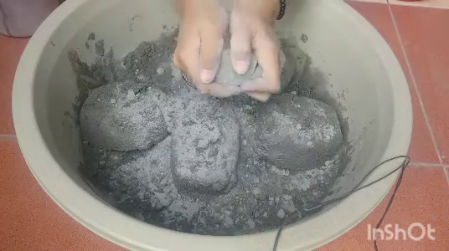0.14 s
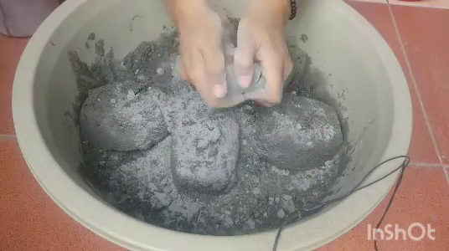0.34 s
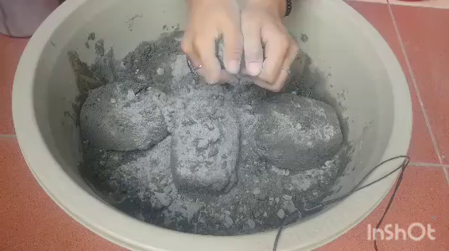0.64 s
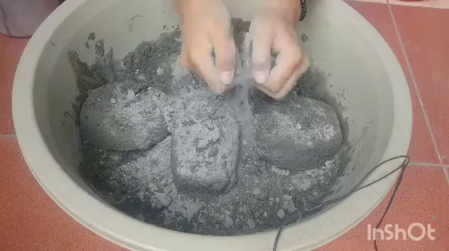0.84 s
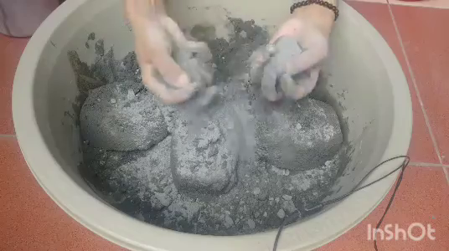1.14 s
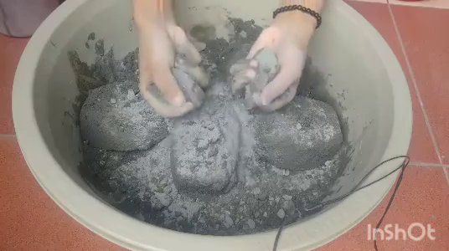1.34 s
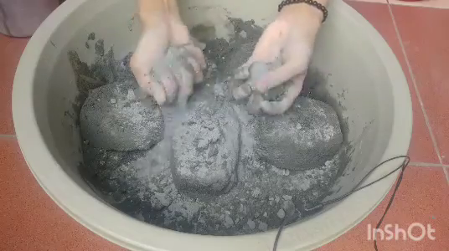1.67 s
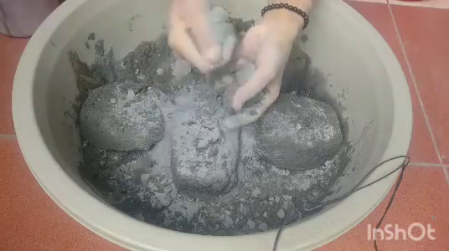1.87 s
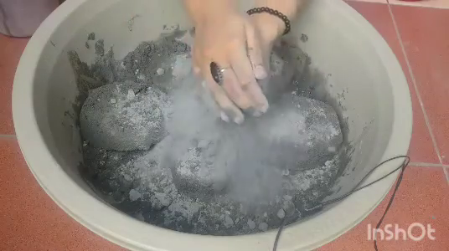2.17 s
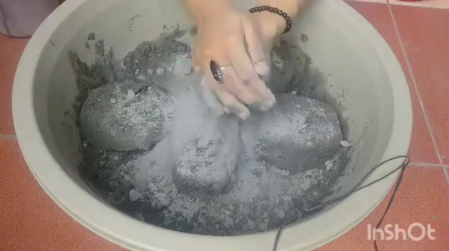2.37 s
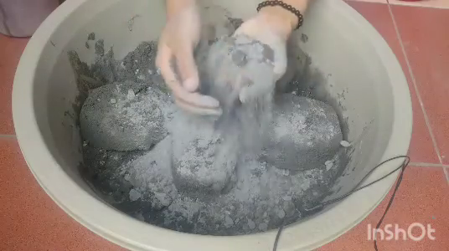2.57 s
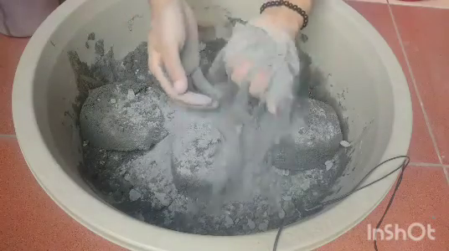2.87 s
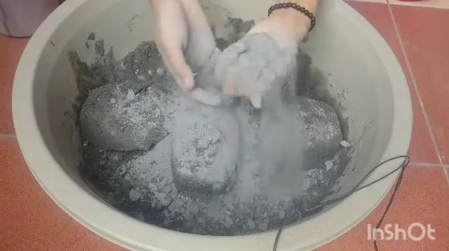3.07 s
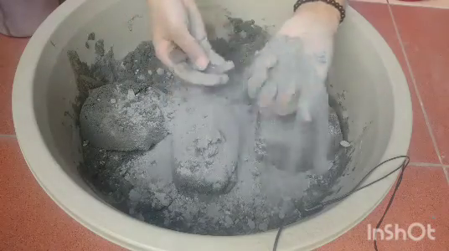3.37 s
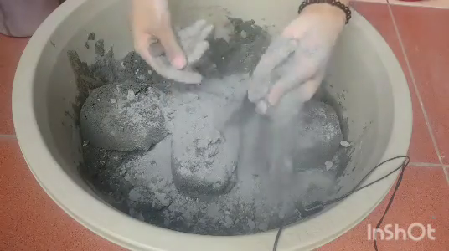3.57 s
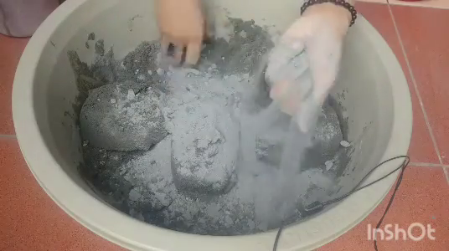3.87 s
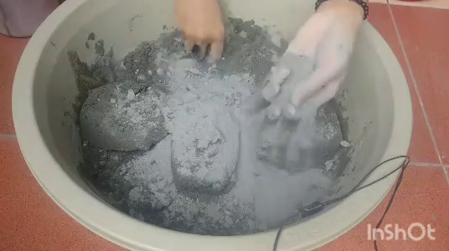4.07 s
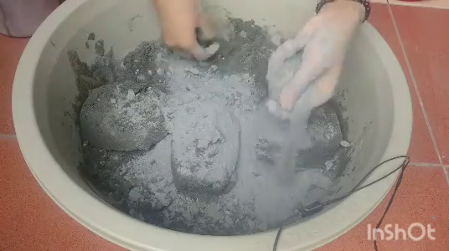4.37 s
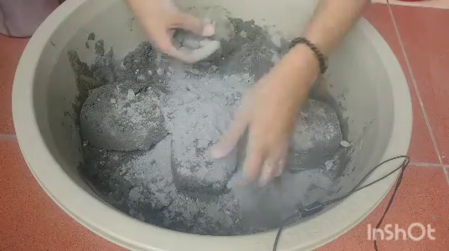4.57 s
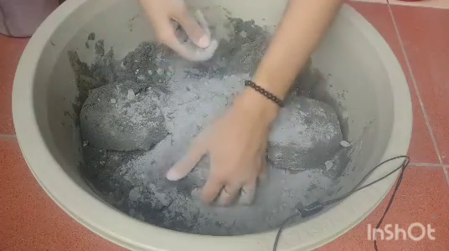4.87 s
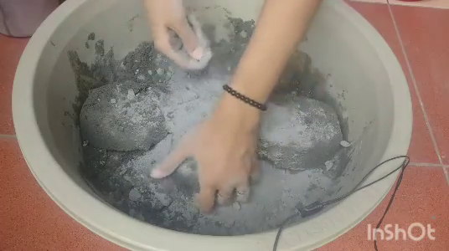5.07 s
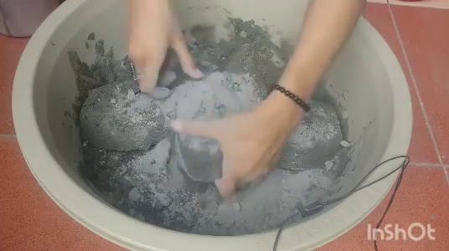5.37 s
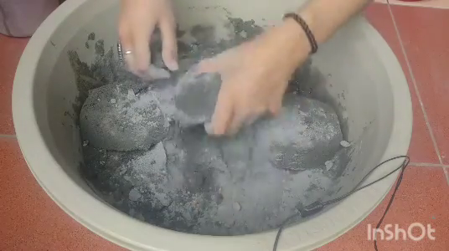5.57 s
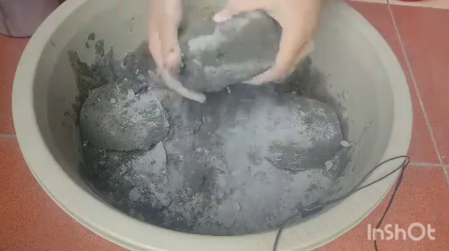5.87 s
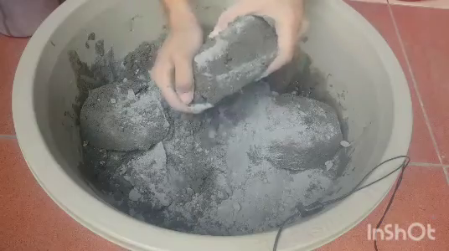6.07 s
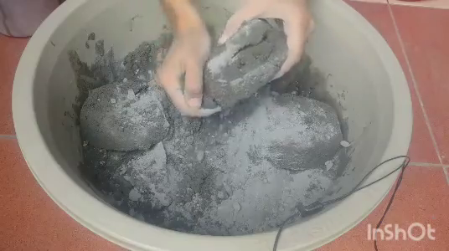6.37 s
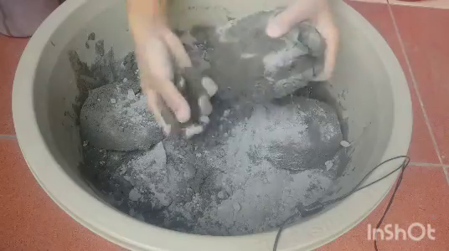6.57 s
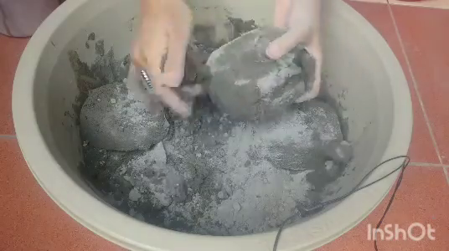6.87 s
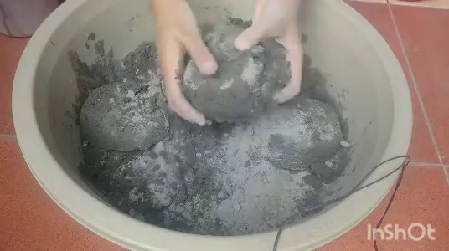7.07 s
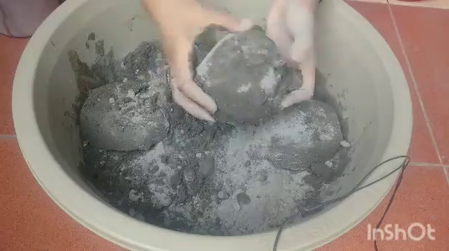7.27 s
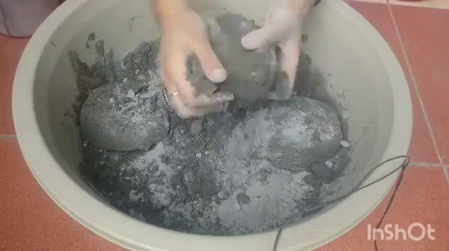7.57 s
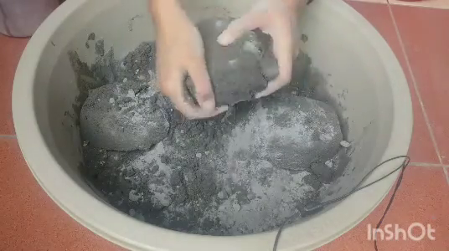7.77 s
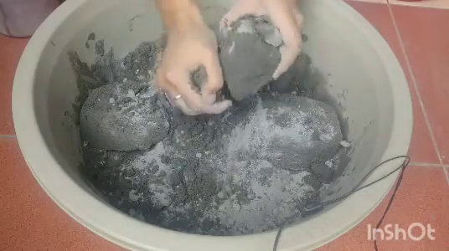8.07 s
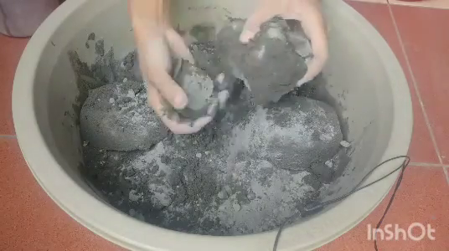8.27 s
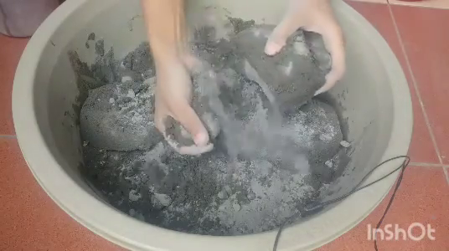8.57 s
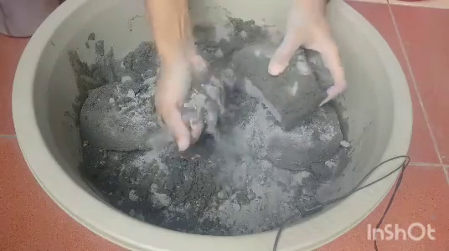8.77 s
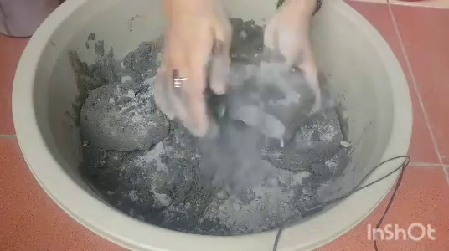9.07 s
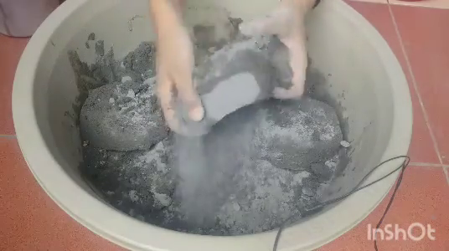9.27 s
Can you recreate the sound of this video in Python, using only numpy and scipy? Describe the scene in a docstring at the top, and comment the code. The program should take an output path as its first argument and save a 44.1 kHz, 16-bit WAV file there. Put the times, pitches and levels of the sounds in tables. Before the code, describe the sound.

Dry lumps crunch and crack between fingers close by, spilling hissing grit and pattering crumbs into a plastic tub.

```python
"""Over a wide plastic tub, close to a phone, hands squeeze dry powder blocks.
Grit rasps and pours in gusts as the fingers rub through it, and crumbs crunch and patter down.
Lumps snap with a sharp tick and a rough knock, and drop onto the tub floor with dull thuds.
A low rumble fills the room behind them."""
import sys
import numpy as np
from scipy import signal
from scipy.fft import rfft, irfft
from scipy.io import wavfile
from scipy.ndimage import uniform_filter1d

SR = 44100
rng = np.random.default_rng(int(sys.argv[2]) if len(sys.argv) > 2 else 0)


def wav_record(signal):
    """Record a signal, one row per channel, as 16-bit PCM in the file named by sys.argv[1]."""
    frames = np.transpose(np.atleast_2d(signal))
    bounded = np.clip(frames, -1, 1)
    # unit amplitude maps onto the largest positive 16-bit level
    quanta = np.round(bounded * 32767).astype(np.int16)
    wavfile.write(sys.argv[1], SR, quanta)


N = 416304


def rubbing_powder():
    """Powder of several grain sizes rubs and spills in gusts, flickering as the fingers slip."""
    # finger strokes through the powder: peak_s, rise_s, fall_s, rasp_db, fringe_db, dust_db
    strokes = [(0.04, 0.12, 0.067, -59.5, -66, -73), (0.15, 0.061, .09, -57, -62, -72),
               (0.253, 0.044, 0.046, -60, -66, -74), (0.46, .12, 0.093, -55, -56, -65),
               (0.57, 0.092, .1, -60.5, -63, -66), (0.825, .06, 0.062, -48.5, -51, -63),
               (0.968, 0.063, 0.14, -64, -66, -69), (1.157, 0.091, 0.077, -55, -63, -72),
               (1.24, 0.059, 0.097, -42, -56, -65), (1.305, 0.018, 0.08, -37, -45.5, -62),
               (1.401, 0.017, .04, -40.5, -58, -65), (1.464, 0.027, 0.067, -36, -42, -58),
               (1.56, .07, .06, -45.5, -50, -70), (1.63, 0.08, 0.15, -41, -47.5, -60),
               (1.82, 0.22, 0.081, -49, -56, -70), (1.945, 0.086, .06, -49, -54.5, -62),
               (2.001, .08, 0.059, -42.5, -51.5, -64), (2.138, 0.022, 0.11, -40.5, -52, -63),
               (2.26, 0.42, .1, -48.5, -58.5, -74), (2.305, 0.042, 0.081, -43, -54, -68),
               (2.407, 0.059, 0.062, -36, -54, -72), (2.582, 0.33, 0.064, -46.5, -59, -78),
               (2.828, 0.18, .14, -42.5, -54, -68), (2.935, 0.099, 0.13, -37.5, -49.5, -69),
               (3.173, 0.034, 0.14, -49.5, -58, -76), (3.358, 0.016, 0.035, -35.5, -50, -58),
               (3.492, .015, 0.11, -54, -55.5, -80), (3.622, 0.028, 0.08, -42.5, -57, -68),
               (3.668, 0.036, .1, -38, -44.5, -62), (3.77, .1, .12, -48, -53, -67),
               (3.885, 0.12, 0.076, -40.5, -50.5, -59), (3.975, 0.0088, 0.025, -36, -70, -65),
               (4.019, 0.031, 0.049, -33, -61, -76), (4.145, 0.051, 0.038, -41.5, -63, -79),
               (4.292, 0.058, 0.082, -43.5, -58, -78), (4.352, .05, .065, -42.5, -56, -73),
               (4.446, 0.052, 0.077, -49, -70, -73), (4.683, 0.037, 0.058, -55, -68, -78),
               (4.771, 0.08, 0.081, -54.5, -58.5, -79.5), (4.883, .012, 0.041, -41.5, -54, -69),
               (4.925, 0.037, 0.046, -49, -72, -83), (5.038, 0.0052, .03, -42, -59, -76),
               (5.065, .03, .05, -48, -62, -74), (5.13, 0.074, 0.091, -48, -59, -73),
               (5.204, 0.19, 0.12, -43.5, -56.5, -68), (5.49, 0.12, 0.17, -59, -69, -81),
               (5.69, 0.16, 0.058, -59.5, -67, -65), (6.036, 0.22, .07, -59, -62.5, -67),
               (6.106, 0.036, 0.085, -48.5, -51, -60), (6.25, .05, .08, -63, -66, -76),
               (6.345, 0.065, 0.053, -56, -60.5, -71), (6.491, 0.1, 0.18, -63.5, -76, -75),
               (6.72, 0.12, 0.19, -50.5, -56.5, -65), (6.82, 0.13, .1, -53, -59, -74),
               (6.914, 0.038, 0.045, -49, -44.5, -53), (6.976, 0.13, 0.047, -46, -52, -80),
               (7.068, .043, 0.098, -45, -48, -56), (7.234, .09, .2, -55, -71, -76),
               (7.35, .08, 0.11, -51.5, -50.5, -65), (7.46, 0.08, 0.07, -62, -56, -67),
               (7.59, 0.062, 0.14, -61, -58, -74), (7.69, 0.081, 0.044, -57, -60, -70),
               (7.836, 0.15, 0.16, -57, -57.5, -68), (7.922, 0.027, 0.025, -46.5, -48.5, -66),
               (8.054, 0.057, 0.094, -47, -53.5, -64), (8.45, 0.25, 0.11, -62, -62, -75),
               (8.542, 0.034, 0.054, -33, -35.5, -51), (8.695, 0.082, 0.074, -35, -34, -49),
               (8.771, .1, .2, -36, -43.5, -59.5), (8.903, 0.11, 0.33, -50, -60, -69),
               (9.2, .03, .15, -45.5, -52.5, -75), (9.245, 0.068, 0.11, -46, -47.5, -61),
               (9.439, 0.26, .1, -52, -51.5, -66)]
    # crumbs breaking up and falling into the tub: peak_s, rise_s, fall_s, crunch_db, patter_db
    spills = [(0.152, .1, 0.04, -68, -48), (0.76, 0.24, 0.37, -65.5, -47.5), (1.321, .25, 0.12, -58, -49),
              (1.401, 0.023, 0.03, -41.5, -39.5), (1.475, 0.074, 0.067, -47.5, -47),
              (1.622, 0.092, 0.22, -49.5, -46.5), (1.92, 0.13, 0.26, -64, -69),
              (2.137, 0.047, 0.076, -46, -42.5), (2.297, 0.021, 0.057, -44, -36.5),
              (2.385, 0.012, 0.042, -31.5, -32), (2.55, 0.46, 0.14, -52.5, -60),
              (2.73, 0.099, 0.097, -58.5, -53), (2.826, 0.026, 0.062, -48.5, -63),
              (2.96, 0.23, 0.11, -51.5, -54), (3.173, 0.018, 0.058, -46, -42),
              (3.356, 0.022, 0.068, -51.5, -45.5), (3.496, 0.018, 0.053, -54, -39),
              (3.526, 0.044, 0.03, -45, -52), (3.6, 0.027, 0.7, -57, -49.5), (3.879, 0.05, .11, -51.5, -57),
              (3.977, 0.0064, 0.081, -36, -28.5), (4.01, 0.033, 0.075, -37.5, -25.5),
              (4.143, 0.035, .04, -35.5, -34), (4.284, 0.038, 0.079, -43, -41.5),
              (4.356, 0.026, 0.041, -35.5, -36), (4.426, 0.0075, 0.051, -40, -44),
              (4.681, .08, 0.042, -54.5, -37.5), (4.883, 0.067, 0.038, -65, -46),
              (5.043, 0.053, 0.11, -70, -53), (5.148, 0.063, 0.17, -60, -53), (5.218, 0.17, 0.12, -56, -62),
              (5.55, 0.29, 0.39, -65.5, -51), (6.186, 0.089, 0.17, -70, -54),
              (6.719, 0.094, 0.11, -59, -56), (6.902, 0.015, 0.057, -33.5, -20),
              (6.982, .1, 0.055, -39.5, -38.5), (7.056, 0.038, 0.16, -50, -43.5),
              (7.236, 0.048, 0.11, -52, -40.5), (7.76, 0.36, 0.22, -68, -48), (7.922, .1, .2, -69, -63),
              (8.054, .12, 0.074, -61, -47), (8.531, 0.018, 0.043, -42, -39),
              (8.68, 0.018, 0.05, -24.5, -34.5), (8.75, 0.056, 0.12, -43, -40),
              (8.892, 0.16, 0.14, -52, -53), (9.012, .05, 0.11, -55, -38),
              (9.205, 0.016, 0.086, -39, -28.5), (9.265, .05, .046, -35.5, -40),
              (9.333, 0.059, 0.093, -47, -41.5)]
    # tone of each grain layer: frequency_hz, gain_db
    rasp_eq = [(2000, -38), (3000, -12), (3500, -9.5), (3800, -4), (4300, 0), (4900, -7), (5400, -17),
               (7000, -49), (9000, -56)]  # gritty scrape
    fringe_eq = [(1500, -25), (2600, -11), (3300, -10.5), (5000, -4), (6000, -4.5), (7200, -8), (7900, -29),
                 (9000, -39), (12000, -80)]  # its bright edge
    dust_eq = [(5000, -47), (7500, -14), (9500, -13), (12000, -8.5), (14000, -10), (16500, -11.5)]  # airy sizzle of the finest powder
    crunch_eq = [(200, -70), (450, -6), (700, 5), (1000, 3), (1600, 3.5), (2500, -0.5), (3500, -7),
                 (5000, -32), (8000, -102)]  # midrange of breaking crumbs
    patter_eq = [(60, -58), (130, -17), (200, 9.5), (350, 7), (600, 2), (900, -30.5), (2000, -68)]  # dull landings
    rasp, fringe, dust = swells(strokes, rest_db=(-74.5, -77, -78))
    crunch, patter = swells(spills, rest_db=(-68.5, -55.5))
    slip = undb(1.5 * flicker(70))
    return (grains(rasp_eq, per_s=3000, spread_db=7.2, hiss=0.93) * rasp * slip
            + grains(fringe_eq, per_s=3500, spread_db=3.8, hiss=0.45) * fringe * slip
            + grains(dust_eq, per_s=4000, spread_db=2.5, hiss=1.2) * dust * undb(1.4 * flicker(57))
            + grains(crunch_eq, per_s=900, spread_db=5.1, hiss=0.96) * crunch * undb(0.76 * flicker(80))
            + grains(patter_eq, per_s=400, spread_db=3.5, hiss=0.8) * patter)


def snapping_lumps():
    """Each lump breaks with a sharp tick, a short rough knock and a spray of debris."""
    # snaps, with peak levels ahead of dull_eq: start_s, tick_db, tick_hz, body_db, body_hz
    snaps = [(0.14, -36.5, 4330, -53, 540), (1.296, -38, 4150, -38.5, 540), (1.3958, -11, 4020, -17, 1460),
             (1.456, -20.5, 4660, -44, 1450), (1.6572, -25, 4530, -40, 1210),
             (1.9098, -33, 3930, -48, 1330), (1.9356, -31.5, 4270, -59, 650),
             (2.1274, -24.5, 4300, -39.5, 1230), (2.2944, -31, 3080, -11, 1000),
             (2.305, -20, 4120, -28, 1460), (2.3764, -14, 3140, -15, 796), (2.388, -20, 3660, -17.5, 940),
             (2.3998, -24, 4060, -19, 1580), (2.45, -46, 3500, -33.5, 865), (2.471, -29, 4300, -40, 1520),
             (2.5087, -32, 4300, -47, 1650), (2.8177, -8.5, 3770, -28.5, 1420),
             (2.979, -31, 3970, -37.5, 520), (3.167, -5, 2970, -14.5, 970), (3.351, -15.5, 4350, -24, 1000),
             (3.4226, -37.5, 4240, -47, 910), (3.4865, -33.5, 3840, -22.5, 643),
             (3.5166, -30, 3090, -28, 790), (3.594, -31, 3080, -37, 690), (3.6992, -37, 4300, -45, 726),
             (3.9695, -18.5, 3860, -30, 650), (3.9787, -22, 3700, -30, 620), (4.0313, -24, 4200, -21, 580),
             (4.34, -26, 4230, -32, 1480), (4.4259, -27, 3570, -29.5, 980), (4.6765, -32, 3730, -30, 510),
             (4.8746, -29, 4300, -46, 620), (5.036, -33, 4170, -63, 900), (6.7134, -40, 4280, -37, 754),
             (6.8714, -35, 4120, -33, 670), (6.8928, -24, 2630, -15.5, 746),
             (6.9063, -14, 2600, -15.5, 864), (6.9158, -22, 4090, -18, 774), (6.95, -33, 4130, -23.5, 710),
             (7.0517, -16.5, 4150, -24.5, 1860), (7.064, -22.5, 3830, -39, 1130),
             (7.097, -29.5, 3800, -42, 800), (7.2313, -20, 4300, -17, 810), (8.5253, -17, 4460, -29, 1500),
             (8.63, -26.5, 4000, -48, 1300), (8.664, -18, 4070, -25, 1360), (8.6737, -11, 3530, -13, 1310),
             (8.6763, -3.5, 4130, -3.5, 1320), (8.696, -27, 3830, -8, 1170), (8.7005, -21, 4040, -0.5, 810),
             (8.7065, -9.5, 4000, -23, 1290), (8.712, -15, 3800, -18, 1140), (8.7547, -23, 3800, -38, 1160),
             (8.766, -29, 4150, -21, 1090), (8.8825, -15.5, 3930, -29.5, 1030),
             (9.0072, -25, 4000, -22.5, 630), (9.176, -33.5, 4200, -43.5, 740), (9.1966, -9, 3660, -9, 990),
             (9.2007, -41, 3570, -11, 640), (9.215, -26, 3600, -30, 816), (9.2221, -24, 4100, -31, 1230),
             (9.2463, -23, 4050, -31, 1110), (9.255, -2.5, 2800, -5, 1140), (9.2658, -25, 3260, -24, 830),
             (9.2746, -30, 3620, -32, 650), (9.3256, -17, 5900, -18, 1190)]
    # broad tone of tick and debris: frequency_hz, gain_db
    tick_eq = [(300, -4), (800, -15), (1500, -14), (2500, -4), (4200, 6.5), (5500, -3.5), (7500, -8.5),
               (9000, -62.5), (16000, -39)]
    # dulls the snaps' treble above 5 kHz, as the microphone colours them: frequency_hz, gain_db
    dull_eq = [(5000, 0.5), (7200, -12), (8200, -23), (11000, -17), (16000, -50)]
    body_cycles, debris_db = 7, -18  # decay time in periods of body_hz; debris rms under the tick
    out, t = np.zeros(N), np.arange(4096) / SR
    noise = rng.standard_normal((len(snaps), 3, len(t)))
    broad = response(tick_eq, len(t))
    for snap, (tick_noise, debris_noise, body_noise) in zip(snaps, noise):
        start_s, tick_db, tick_hz, body_db, body_hz = snap
        burst = tick_noise * np.exp(-t / 0.00073)
        ping = signal.lfilter(*signal.iirpeak(tick_hz, Q=3.5, fs=SR), burst)
        tick = peak(irfft(rfft(burst) * broad), -3) + peak(ping, 0)
        debris = level(irfft(rfft(debris_noise) * broad), debris_db) * undb(-60 * t / 0.022)
        # a crumbly lump rings only briefly and keeps breaking while it does
        t60 = body_cycles / body_hz
        crumbling = body_noise * undb(-60 * t / (2.1 * t60))
        resonance = signal.iirpeak(body_hz, Q=1.1, fs=SR)
        rough = signal.lfilter(*resonance, signal.lfilter(*resonance, crumbling))
        knock = ring(t, 1.187 * body_hz, t60, sag=0.28, rise_s=0.0001) + peak(rough, -0.59)
        add(out, start_s, undb(tick_db) * (peak(tick, 0) + debris) + peak(knock, body_db))
    return colour(out, dull_eq)


def tub_thuds():
    """The tub floor answers each falling lump with a few low swings and a faint overtone."""
    # lumps landing: start_s, level_db, pitch_hz, ring_s
    landings = [(0.78, -22, 375, 0.019), (2.292, -33.5, 260, 0.038), (2.373, -48, 276, 0.05),
                (3.428, -29, 128, 0.086), (3.483, -37, 135, 0.059), (3.988, -17, 132, 0.051),
                (4.006, -18.5, 163, 0.052), (4.033, -19.5, 495, 0.035), (4.051, -17.5, 138, 0.033),
                (4.16, -35, 128, 0.035), (4.343, -40, 141, 0.066), (4.675, -24.5, 165, 0.036),
                (6.906, -5, 172, 0.031), (8.017, -20, 167, 0.019), (8.526, -39, 142, 0.091),
                (8.696, -21.5, 456, 0.069), (9.005, -32, 141, 0.076), (9.196, -17.5, 470, 0.019)]
    out, t = np.zeros(N), np.arange(12000) / SR
    for start_s, level_db, pitch_hz, ring_s in landings:
        thud = ring(t, pitch_hz, ring_s, sag=0.13, rise_s=0.005)
        overtone = ring(t, 1.67 * pitch_hz, 1.67 * ring_s, sag=0.3, rise_s=0.019)
        add(out, start_s, undb(level_db) * (thud + 0.091 * overtone))
    return out


def room_tone():
    """A low rumble that swells slowly, faint tones and the hiss of the microphone."""
    # tone of rumble and hiss: frequency_hz, gain_db
    room_eq = [(15, -86), (25, -47), (61, -5.5), (111, 3.5), (157, -12), (195, -11.5), (223, -23.5),
               (326, -20.5), (451, -30), (591, -27), (677, -34.5), (1610, -51), (4490, -50), (14800, -60.5),
               (16000, -92)]
    # fader ride on the rumble, taken relative to its mean: time_s, level_db
    rumble_ride = [(0.0, -41), (1.1, -41.5), (1.52, -38), (1.89, -42.5), (2.21, -40.5), (2.58, -42.5),
                   (3.6, -40.5), (3.78, -42.5), (4.18, -38), (4.6, -44), (5.28, -39), (5.78, -41.5),
                   (6.78, -36), (7.65, -40), (8.15, -40), (9.1, -37), (9.25, -36.5), (9.44, -32)]
    # faint wavering tones: pitch_hz, width_hz, level_db
    hums = [(330.3, 17.5, -59), (597, 2.7, -66.5)]
    bed = level(colour(rng.standard_normal(N), room_eq), db=-37.5)
    rumble = signal.sosfiltfilt(signal.butter(2, 400, fs=SR, output="sos"), bed)
    hiss = bed - rumble
    swell_db = np.interp(np.arange(N) / SR, *np.transpose(rumble_ride))
    out = hiss + rumble * undb(swell_db - swell_db.mean())
    for pitch_hz, width_hz, level_db in hums:
        band = signal.iirpeak(pitch_hz, pitch_hz / width_hz, SR)
        out += level(signal.lfilter(*band, rng.standard_normal(N)), level_db)
    return out


def grains(eq, per_s, spread_db, hiss):
    """Dense tiny breaks, a few larger than the rest, over a smooth hiss; rms 1."""
    chance, size_draw, polarity = rng.random((3, N))
    size_db = np.minimum(-spread_db * np.log(1 - size_draw), 3 * spread_db)
    breaks = (chance < per_s / SR) * undb(size_db) * np.sign(polarity - 0.5)
    texture = level(breaks, 0) + hiss * rng.standard_normal(N)
    return level(colour(texture, eq), 0)


def swells(gestures, rest_db):
    """One envelope per layer: each gesture swells and dies away, adding power to the resting level."""
    depth_db = 20  # gained over the rise time, lost over the fall time
    roundness = 1.13  # 1 = pointed peak, 2 = domed top
    t = np.arange(N // 64 + 2) * 64 / SR
    power = undb(rest_db)[:, None] ** 2 * np.ones(len(t))
    for peak_s, rise_s, fall_s, *layer_db in gestures:
        from_peak = np.maximum((peak_s - t) / rise_s, (t - peak_s) / fall_s)
        shape = undb(-depth_db * from_peak ** roundness)
        power += np.outer(undb(layer_db), shape) ** 2
    return [np.interp(np.arange(N) / SR, t, np.sqrt(layer)) for layer in power]


def flicker(rate_hz):
    """Random steps, smoothed twice; spread near 1."""
    hold = int(SR / rate_hz)
    steps = np.repeat(rng.standard_normal(N // hold + 1), hold)
    return 1.3 * uniform_filter1d(uniform_filter1d(steps, hold), hold)[:N]


def ring(t, hz, t60, sag, rise_s):
    """A damped swing whose pitch sags as the broken piece settles; peak 1."""
    phase = 2 * np.pi * hz * t * (1 - sag * np.minimum(t / t60, 1))
    envelope = undb(-60 * t / t60) * (1 - np.exp(-t / rise_s))
    return peak(np.sin(phase) * envelope, 0)


def response(eq, size):
    """Causal frequency response of (Hz, dB) points, from the cepstrum of the log gain."""
    hz, db = np.transpose(eq)
    bin_hz = np.arange(size // 2 + 1) * SR / size
    gain_db = np.interp(np.log(bin_hz + 1), np.log(hz), db)
    cepstrum = irfft(gain_db * np.log(10) / 20, size)
    cepstrum[1:size // 2] *= 2
    cepstrum[size // 2 + 1:] = 0
    return np.exp(rfft(cepstrum))


def colour(x, eq):
    """Filter by a curve of (Hz, dB) points."""
    impulse = irfft(response(eq, 16384))[:8192]
    return signal.oaconvolve(x, impulse)[:len(x)]


def undb(db):
    return 10 ** (np.asarray(db) / 20)


def level(x, db):
    """Scale to an rms level."""
    return x * undb(db) / np.sqrt(np.mean(x ** 2))


def peak(x, db):
    """Scale to a peak level."""
    return x * undb(db) / np.abs(x).max()


def add(out, start_s, x):
    """Mix a short sound in."""
    i = int(start_s * SR)
    out[i:i + len(x)] += x[:N - i]


def scene():
    """Powder, snaps and thuds over the room, in mono."""
    return (rubbing_powder() + snapping_lumps() + tub_thuds() + room_tone())[None]


def record(dry):
    """The phone rounds the very loudest peaks and cuts the deepest bass and the top."""
    bass_hz, top_hz = 45, 15900
    trimmed = signal.sosfilt(signal.butter(3, bass_hz, "high", fs=SR, output="sos"), dry)
    rounded = trimmed / (1 + trimmed ** 6) ** (1 / 6)
    return signal.sosfilt(signal.ellip(10, 0.2, 70, top_hz, fs=SR, output="sos"), rounded)


dry = scene()
out = record(dry)
wav_record(out)
```